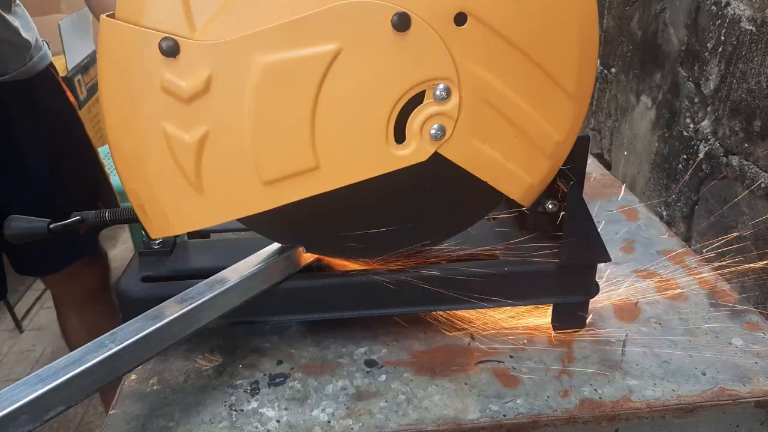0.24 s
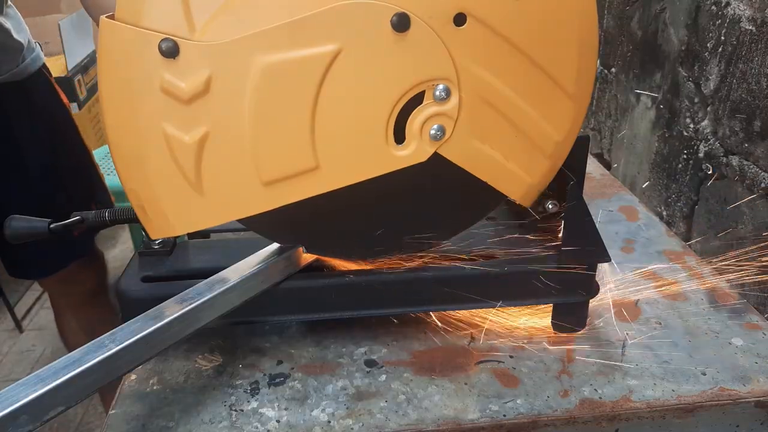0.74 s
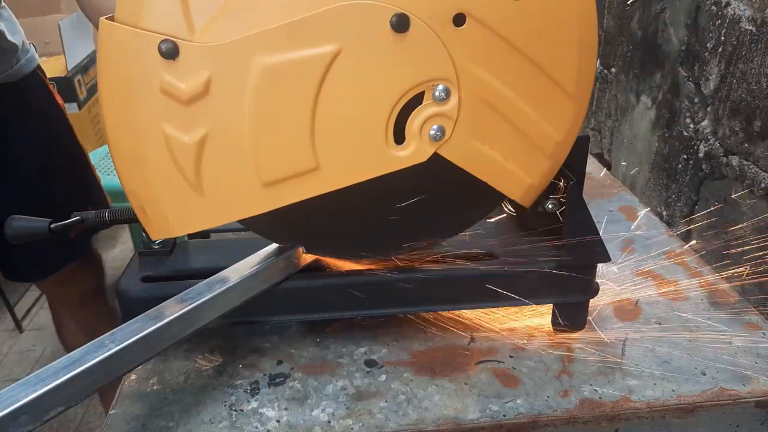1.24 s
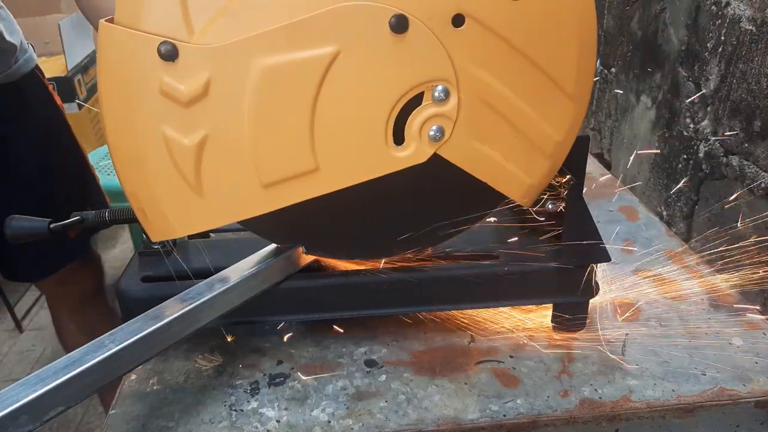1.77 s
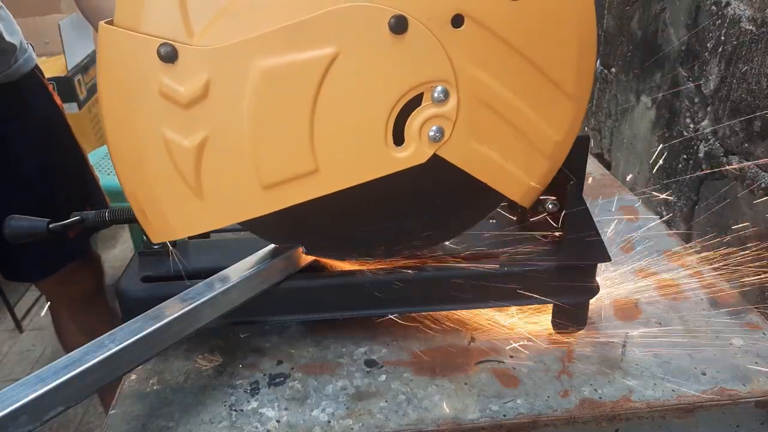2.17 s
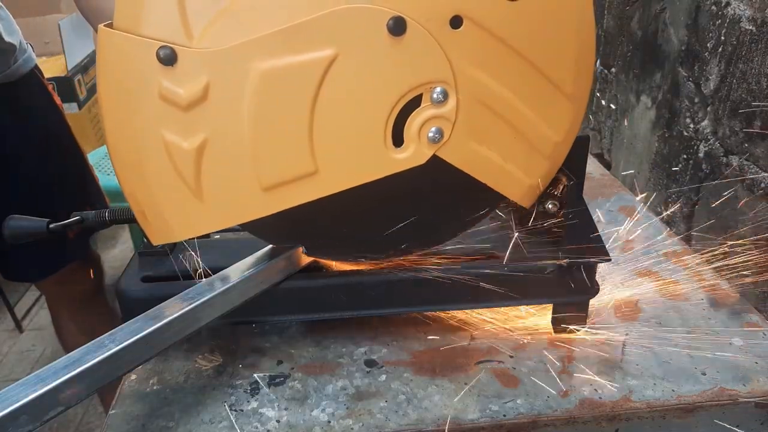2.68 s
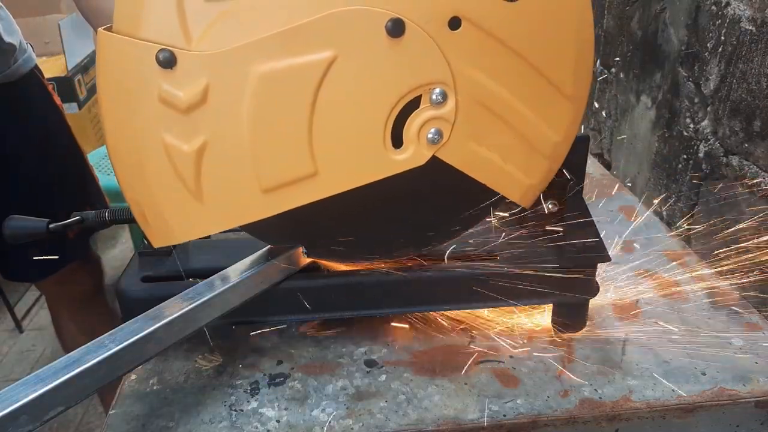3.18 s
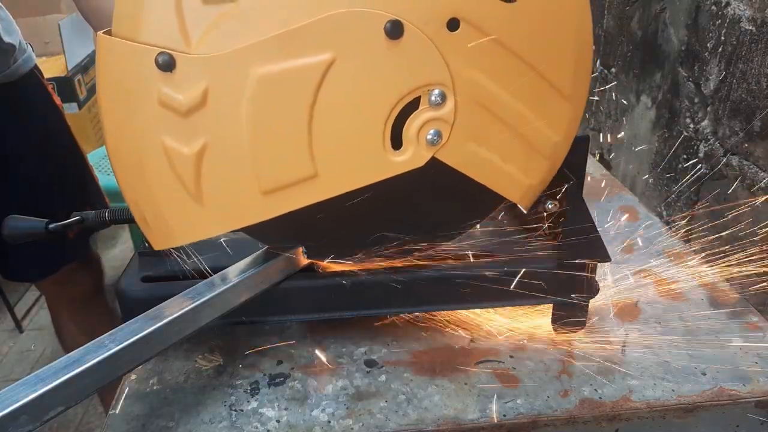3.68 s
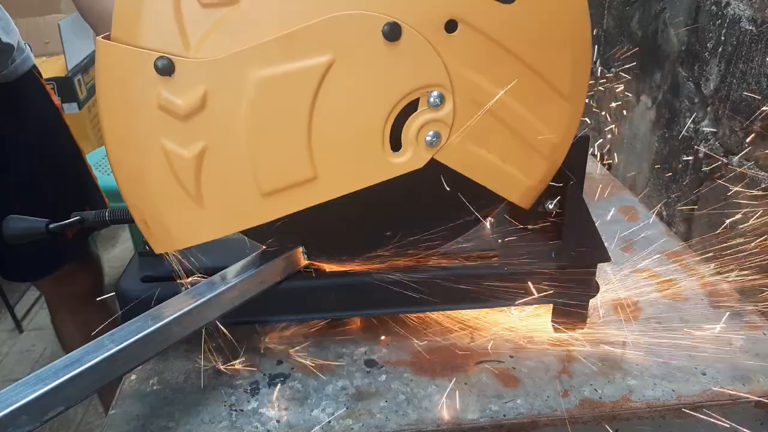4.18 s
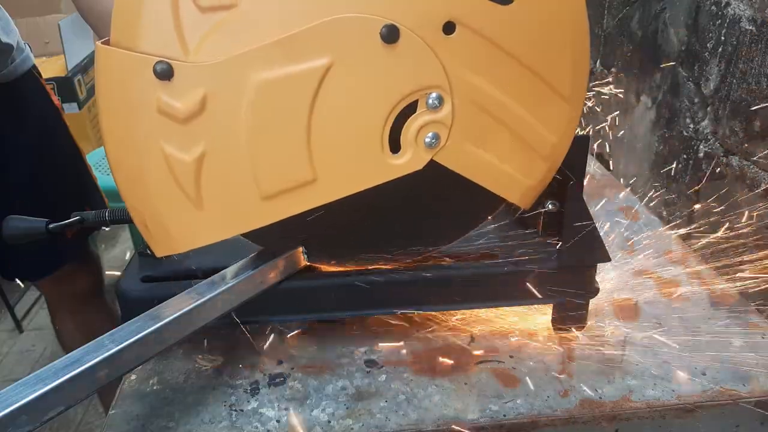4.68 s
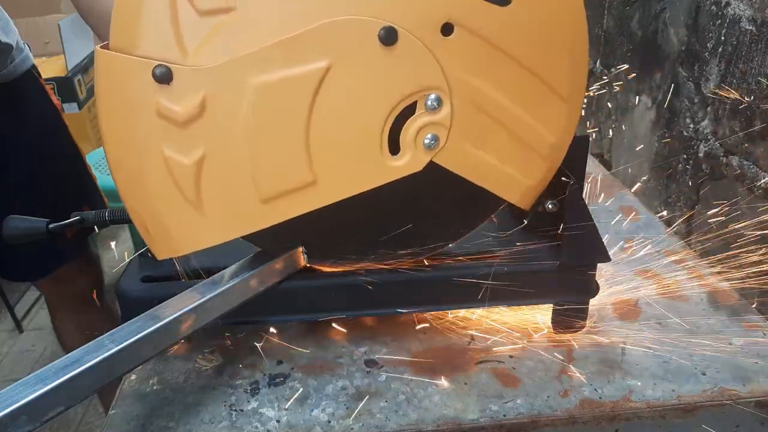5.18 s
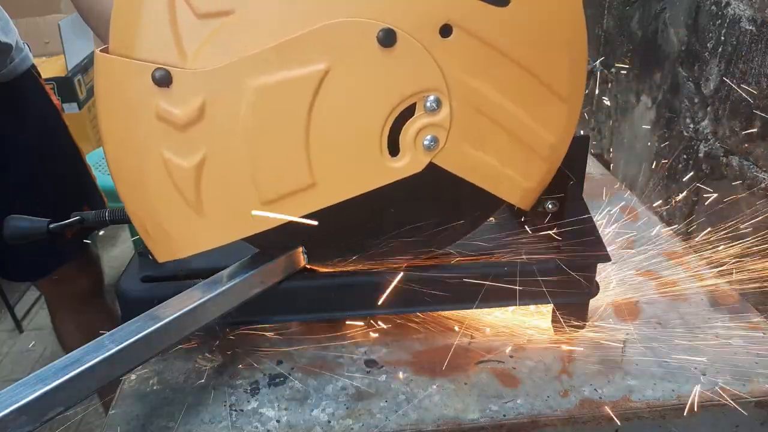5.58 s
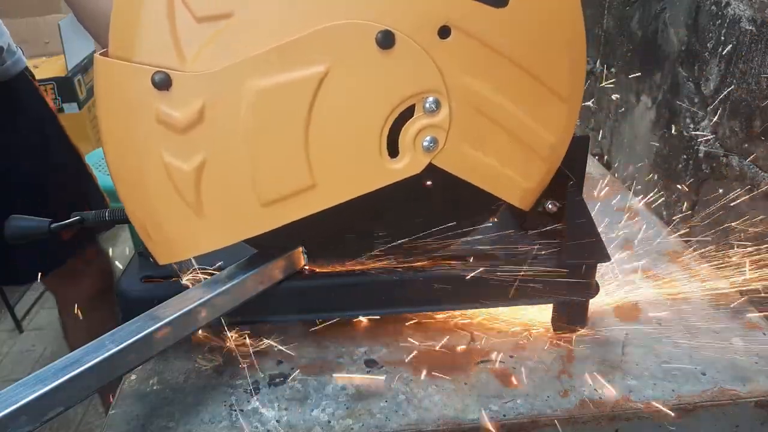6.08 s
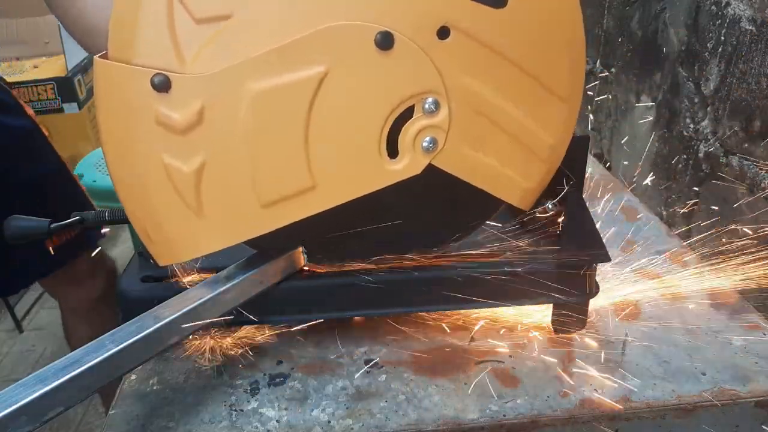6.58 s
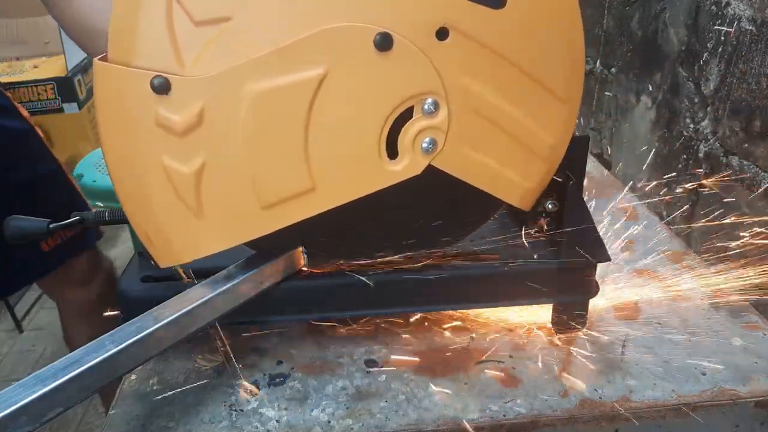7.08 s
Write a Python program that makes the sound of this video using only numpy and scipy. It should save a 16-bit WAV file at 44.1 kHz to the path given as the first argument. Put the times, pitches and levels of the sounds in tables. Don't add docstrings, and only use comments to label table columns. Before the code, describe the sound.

Harsh, continuous high-pitched grinding of a cut-off saw in square steel tube, ringing whistles sliding inside the screech over a low motor hum.

```python
import sys
import numpy as np
from scipy import signal
from scipy.fft import rfft, irfft
from scipy.io import wavfile
from scipy.ndimage import uniform_filter1d, map_coordinates

SR = 44100
rng = np.random.default_rng(int(sys.argv[2]) if len(sys.argv) > 2 else 0)


def ratio_of_db(decibels):
    return 10 ** (np.asarray(decibels, float) / 20)


def dump(signal):
    limited = np.clip(np.atleast_2d(signal).T, -1, 1)
    pcm = np.round(limited * 32767).astype(np.int16)
    wavfile.write(sys.argv[1], SR, pcm)


N = 323694


def evened(x):
    return x / np.sqrt(np.mean(x ** 2) + 1e-20)


def curve(rows, t, axis=1):
    rows = np.array(rows)
    return np.interp(t, rows[:, 0], rows[:, axis])


def patches(shape, tall, wide):
    field = uniform_filter1d(rng.standard_normal(shape), max(round(tall), 1), axis=0)
    return evened(uniform_filter1d(field, max(round(wide), 1), axis=1))


# time in seconds, speed in turns per second.
DISC_SPEED = [(0.0, 52.62), (0.3, 52.04), (0.7, 51.53), (1.3, 50.89), (1.9, 50.02), (2.3, 49.38),
              (2.7, 49.03), (3.3, 48.67), (3.6, 48.62), (4.1, 48.36), (4.35, 48.14), (4.65, 47.74),
              (5.3, 47.74), (5.75, 47.63), (6.1, 47.71), (6.45, 47.97), (6.75, 48.37), (7.34, 48.64)]


def shaft_turns():
    return np.cumsum(curve(DISC_SPEED, np.arange(N) / SR)) / SR


# time in seconds, share of the power that repeats each turn (0-1).
REPEAT = [(0, .55), (.5, .68), (1.8, .58), (2.5, .68), (3.2, .64), (3.38, .88), (3.6, .86), (3.8, .74),
          (4.55, .74), (4.65, .92), (5.3, .92), (5.7, .85), (6.2, .88), (6.6, .75), (7, .8), (7.34, .8)]


def grit(turns, uneven_db=2., lasts=8, wobble=.25):
    points, top_order = 1024, 400
    always_lost, loose_lost = .035, .03
    count = int(turns[-1]) + 3
    turn_s = np.interp(np.arange(count), turns, np.arange(N) / SR)
    like = 1 - always_lost - loose_lost * (1 - curve(REPEAT, turn_s))
    rim = rng.standard_normal((count, points))
    for k in range(1, count):
        rim[k] = like[k] * rim[k - 1] + np.sqrt(1 - like[k] ** 2) * rim[k]
    z = signal.stft(rim.ravel(), nperseg=2 * points)[2]
    z[top_order * 2:] = 0
    z = z * ratio_of_db(uneven_db * patches(z.shape, 2, 4 * lasts))
    rim = signal.istft(z, nperseg=2 * points)[1]
    drift = uniform_filter1d(rng.standard_normal(N), 1500)
    flutter = wobble * evened(uniform_filter1d(drift, 1500))
    return map_coordinates(rim, [turns * points + flutter + points / 2], order=3)


# frequency in Hz, then level in dB in the top wall, entering the sides,
# deep in the sides, pressing on.
COLOURS = [(40.3, -42, -49, -31, -44), (99, 0, -25, -11, -13), (357, -14.5, -18, -14.5, -16.5),
           (433, -3, -4, -4, -5), (1050, -7.5, -12.5, -7, -10), (1390, -5.5, -6, -2.5, -3.5),
           (1800, -8.5, -10, -6.5, -11.5), (2980, -5, -10.5, -3.5, -6.5), (4770, -1.1, -9.5, -2, -4),
           (5750, -6, -8.5, -6.5, -2.5), (8150, 1, -7, -0.6, -1.9), (10980, -7, -12, -9.5, -10.5),
           (13050, -14.5, -19, -16, -18), (16400, -28, -32, -29, -31)]
STAGE_AT = [1.002, 3.1, 5.2, 6.802]
# frequency in Hz, width in Hz, level in dB.
RINGS = [
    [(4480, 41, -5), (5060, 41, 0), (5970, 87, -3), (6050, 51, -3.5), (7640, 68, -3), (8360, 400, -1.5),
     (8970, 110, 2), (10600, 50, 0.5)],
    [(3197, 41, 1.5), (4100, 110, -5), (6170, 63, -7.5), (6520, 18, 4.5), (7560, 66, -4), (7200, 66, -11),
     (8360, 85, -8), (8800, 170, -16)],
    [(4393, 66, 4), (4480, 25, -5), (5770, 70, -2), (7380, 73, -20), (7340, 50, -4), (8350, 29, 5.5),
     (10500, 57, -22)],
    [(2250, 57, -3), (3350, 50, 4), (4230, 37, 4), (4640, 72, 0), (6300, 31, -9), (6625, 53, 2.5),
     (8550, 61, 2)],
]


def body(hz, t, ring_db=1., wide=1.5, lumpy_db=2., patchy_db=1.):
    table, speed = np.array(COLOURS), curve(DISC_SPEED, t)
    fizz_db = 4 * np.clip((hz - 14000) / 1500, 0, 1)
    power = np.zeros((len(hz), len(t)))
    for k, (at, rings) in enumerate(zip(STAGE_AT, RINGS)):
        stage = np.interp(t, STAGE_AT, np.eye(len(RINGS))[k])
        colour_db = np.interp(np.log(hz + 1), np.log(table[:, 0]), table[:, k + 1], left=-40)
        power += stage * ratio_of_db(2 * (colour_db + fizz_db))[:, None]
        for ring_hz, width, db in rings:
            centre_hz = ring_hz * speed / curve(DISC_SPEED, at)
            off = (hz[:, None] - centre_hz) / (wide * width / 2)
            power += stage * ratio_of_db(2 * (db + ring_db)) / np.square(1 + off * off)
    thicket_db = lumpy_db * patches(power.shape, 3, 160) * np.clip(hz / 3000, .3, 1)[:, None]
    return np.sqrt(power) * ratio_of_db(thicket_db + patchy_db * patches(power.shape, 8, 30))


# time in seconds, screech level in dB.
BITE = [(0, -12), (.3, -12), (.8, -11), (2.2, -11.5), (2.8, -11.5), (3.5, -11.5), (3.75, -10.5), (4, -11.5),
        (4.35, -11), (5, -13), (6, -11.5), (6.5, -11), (6.8, -10), (7.34, -10)]
BAND_HZ = [330, 2500, 10500]
LAYERS = [
    (-29, -29.5, -32, -31.5),
    (-13, -11, -10.5, -11.5),
    (0, 0, 0, -1),
    (-10, -13.5, -11, -14),
]


def grind(turns, blur_hz=7500, beat=.09):
    jolt_db, jolt_s = [12, 5, .5, -1], .38
    hz, t, old = signal.stft(grit(turns), SR, nperseg=1024, noverlap=768)
    new = signal.stft(rng.standard_normal(N), SR, nperseg=1024, noverlap=768)[2]
    old_power = uniform_filter1d((abs(old) ** 2).mean(1), size=21)
    old = old / np.sqrt(old_power / (abs(new) ** 2).mean() + 1e-9)[:, None]
    share = np.clip(curve(REPEAT, t), 0, 1) ** np.maximum(hz / blur_hz, 1.1)[:, None]
    share *= np.clip(hz / 2000, .35, 1)[:, None]
    z = np.sqrt(share) * old + np.sqrt(1 - share) * new
    colour, band = body(hz, t), np.searchsorted(BAND_HZ, hz)
    for k, layer_db in enumerate(LAYERS):
        level_db = curve(BITE, t) + np.interp(t, STAGE_AT, layer_db) + jolt_db[k] * np.exp(-t / jolt_s)
        band_power = (colour[band == k] ** 2).sum(0)
        colour[band == k] *= ratio_of_db(level_db) * np.sqrt(len(hz) / band_power)
    out = signal.istft(z * colour, SR, nperseg=1024, noverlap=768)[1]
    return out[:N] * (1 + beat * np.cos(2 * np.pi * turns))


# start in seconds, end in seconds, shaft order, level in dB.
SQUEALS = [(0.31, 0.58, 157, -25.6), (1.12, 1.75, 82, -28), (2.03, 2.6, 84, -19.4), (2.07, 2.48, 132, -27),
           (2.23, 2.64, 149, -24.8), (2.9, 4.5, 65, -26.5), (2.8, 3.3, 83, -25.5), (3.0, 3.8, 85, -21.5),
           (3.3, 3.75, 84, -24.2), (3.17, 3.75, 66, -26.5), (3.8, 4.65, 66, -22.5),
           (4.53, 5.66, 169, -25.5), (4.68, 4.91, 84, -23), (4.74, 5.41, 85, -25.9), (4.91, 5.5, 84, -20.2),
           (5.37, 6.67, 99, -26), (5.41, 6.04, 155, -26), (5.41, 6.08, 85, -19.1), (5.66, 6.29, 68, -24.1),
           (5.71, 6.25, 84, -19.7), (6.08, 6.67, 67, -25.4), (6.08, 6.9, 85, -23.6), (6.3, 6.83, 84, -14.2),
           (6.46, 7.34, 83, -21.4), (6.5, 7, 122, -27), (6.67, 6.92, 139, -24.5), (6.75, 7.34, 143, -24.9),
           (6.82, 7.08, 97, -21), (7.02, 7.4, 85, -16), (0, .35, 82, -27)]
# start in seconds, end in seconds,
# mode frequency in Hz, level in dB.
TUBE_MODES = [(0, 2.6, 4300, -28.5), (0, 1.1, 4040, -26.5), (0, 1.85, 5900, -33), (.27, 2.5, 6100, -32),
              (.46, 1.32, 5240, -29), (.65, 1.4, 4960, -29), (.65, 2.6, 3325, -30), (.58, 1.8, 7680, -32),
              (.3, 1.3, 2694, -31.5), (.77, 1.43, 2915, -30.5), (1.32, 1.75, 2280, -31),
              (.08, 0.65, 8400, -24), (1.71, 2.7, 3824, -29.5), (1.87, 2.76, 8550, -26),
              (2.72, 3.76, 4890, -27), (3.21, 3.75, 6520, -29), (3.54, 3.5, 4540, -29),
              (4.6, 5.3, 3080, -31), (4.12, 4.66, 2470, -30), (4.62, 4.8, 8320, -27),
              (4.7, 6.13, 7920, -27), (5.5, 6, 8980, -27), (5.83, 7.6, 6730, -26), (5.92, 6.7, 5860, -25),
              (6.88, 7.7, 2185, -33), (6.88, 7.34, 8255, -25), (6.92, 7.7, 3200, -26.5),
              (4.081, 5.1, 9130, -27), (4.1, 4.5, 8200, -30), (5.7, 6.5, 2250, -34)]


def squeals(turns, lift_db=1., flutter_db=1.5, fade_s=.15, beat=.3):
    mode_width_hz, step_s = 34, .07
    speed, spin = np.gradient(turns) * SR, np.exp(2j * np.pi * turns)
    out, rows = np.zeros(N), [(*row, None) for row in SQUEALS]
    for a, b, hz, db in TUBE_MODES:
        first, last = hz / curve(DISC_SPEED, np.array([a, b]))
        orders = range(int(min(first, last)), int(max(first, last)) + 2)
        rows += [(a, b, order, db, hz) for order in orders]
    for a, b, order, db, hz in rows:
        i = max(round((a - fade_s / 2) * SR), 0)
        j = min(round((b + fade_s / 2) * SR), N)
        t = np.arange(i, j) / SR
        swell = np.clip(np.minimum(t - a, b - t) / fade_s + .5, 0, 1)
        swell *= 1 + beat * (spin[i:j] * np.exp(1j * order)).real
        if hz:
            swell /= 1 + ((order * speed[i:j] - hz) / mode_width_hz) ** 2
        flutter, slip = rng.standard_normal((2, 60))
        level = ratio_of_db(db + 2.5 + lift_db + flutter_db * flutter)
        level, slip = (np.interp(t - a, np.arange(-2, 58) * step_s, k) for k in (level, slip))
        phase = 2 * np.pi * order * turns[i:j] + .33 * slip + order ** 2
        out[i:j] += swell * level * np.cos(phase)
    return out


# shaft order, then level in dB in the top wall, entering the sides,
# deep in the sides, pressing on.
HUM = [(1, -54, -60, -54, -59), (2, -43.5, -50, -46.5, -44), (3, -53, -55, -43, -53),
       (4, -61, -52, -46.5, -46), (5, -50, -42, -44.5, -40.5), (6, -54, -51, -47.5, -48.5),
       (7, -55, -57, -54, -54), (8, -50, -38, -40, -46), (9, -41, -46, -36, -42), (10, -48, -46, -35, -41),
       (16, -29, -42, -38, -39), (27, -50, -38, -39, -45)]
HUM_AT = [1.85, 2.1, 2.7, 4.1, 5.8, 7]


def hum(turns, lift_db=.5, wander_db=1.2):
    t, out = np.arange(0, N / SR + .05, .05), np.zeros(N)
    for order, wall, entering, deep, press in HUM:
        wander = np.interp(t, np.linspace(0, N / SR, 12), rng.standard_normal(12))
        stage_db = np.interp(t, HUM_AT, [wall, entering, entering, deep, deep, press])
        level = ratio_of_db(stage_db + 3 + lift_db + wander_db * wander)
        tone = np.cos(2 * np.pi * (order * turns + rng.random()))
        out += np.interp(np.arange(N) / SR, t, level) * tone
    return out


# time in seconds, lower edge in Hz, upper edge in Hz.
PUFFS = [(.078, 4177, 5168), (.078, 6848, 8269), (.47, 9604, 12446), (.827, 6848, 8312),
         (.827, 12403, 13781), (.958, 6848, 8269), (1.472, 4177, 5168), (1.472, 5685, 8312),
         (1.472, 13092, 14470), (2.238, 13049, 14470), (2.583, 6245, 7580), (2.633, 4177, 5211),
         (2.633, 12403, 13824), (2.728, 4177, 5211), (3.338, 6288, 9647), (3.59, 10982, 12403),
         (3.872, 4177, 5168), (4.278, 13867, 15848), (4.682, 4608, 6331), (4.682, 13781, 15116),
         (4.824, 5125, 6331), (4.824, 8226, 9690), (5.172, 4608, 6331), (5.312, 11025, 12446),
         (5.88, 12403, 13781), (6.002, 12360, 14470), (6.113, 7537, 9001), (6.484, 6288, 7623),
         (7.068, 4608, 5728), (7.068, 8915, 11025)]


def side_puffs(mid, lift_db=-3.5):
    hop, grid = 1024, 502
    out, n, line = np.zeros(N + 2 * hop), np.arange(2 * hop), np.arange(hop) + .5
    window = signal.windows.kaiser_bessel_derived(2 * hop, 4 * np.pi)
    line_hz = line * SR / (2 * hop)
    for s, lo, hi in PUFFS:
        used = line[(line_hz > lo) & (line_hz < hi)]
        cosines = np.cos(np.pi / hop * np.outer(n + 512.5, used))
        i = round((s * SR - grid) / hop) * hop + grid - hop
        band = np.linalg.norm((mid[i:i + 2 * hop] * window) @ cosines) * 2 / hop
        noise = evened(cosines @ rng.standard_normal(len(used)))
        out[i:i + 2 * hop] += ratio_of_db(lift_db) * band * noise * window / np.sqrt(2)
    return out[:N]


# time in seconds, length in slots of about 32 ms.
THINNED = [(.874, 1), (1.176, 1), (1.431, 1), (1.64, 1), (1.686, 1), (1.733, 1), (1.849, 1), (2.011, 1),
           (2.058, 1), (2.128, 1), (3.196, 1), (3.985, 1), (4.496, 1), (4.542, 1), (5.796, 1), (6.76, 2),
           (7.189, 1), (7.325, 1)]


def thinned(x, apart_hz=650, top_hz=10500, top_db=-13., keep_db=-1.8, blur=.02):
    out = x.copy()
    for s, slots in THINNED:
        length_s, lost = .004 + .032 * slots, 1 - .045 ** slots
        i = round((s - length_s / 2) * SR)
        part = x[i:i + round(length_s * SR)]
        fade = np.clip(lost, 0, 1) * signal.windows.tukey(len(part), .8)
        z, hz = rfft(part), np.fft.rfftfreq(len(part), 1 / SR)
        kept = np.zeros_like(z)
        edges = 150 + apart_hz * (np.arange(26) + .8 * rng.random(26))
        for lo, hi in zip(edges, edges[1:]):
            inside = (hz >= lo) & (hz < hi)
            peak_hz = hz[inside][abs(z[inside]).argmax()]
            quiet = (lo > top_hz) | (900 < peak_hz < 2400)
            weak_db = -top_db * quiet * 2 * rng.random()
            line = z * (abs(hz - peak_hz) < 20 + blur * peak_hz)
            match = np.linalg.norm(z[inside]) / (np.linalg.norm(line) + 1e-9)
            kept += line * match * ratio_of_db(keep_db - weak_db)
        out[i:i + len(part)] = (1 - fade ** 2) ** .64 * part + fade * irfft(kept, len(part))
    return out


# time in seconds, level in dB.
KNOCKS = [
    (6.668, -15.),
    (6.736, -10),
    (6.978, -15),
]


def knocks():
    ring_hz, t60_s, attack_s = 482, .049, .0022
    out, t = np.zeros(N), np.arange(3000) / SR
    for s, db in KNOCKS:
        i = round(s * SR)
        envelope = np.minimum(t / attack_s, 1) * ratio_of_db(db - 60 * t / t60_s)
        out[i:i + len(t)] += envelope * np.sin(2 * np.pi * ring_hz * t)
    return out


def scene():
    turns = shaft_turns()
    saw = ratio_of_db(-.5) * grind(turns) + squeals(turns) + hum(turns) + knocks()
    return np.array([saw, saw])


def roll_off(x):
    return signal.sosfilt(signal.butter(12, 16220, fs=SR, output="sos"), x)


def record(dry):
    mid = thinned(np.clip(dry[0], -.93, .93))
    side = side_puffs(mid)
    return roll_off(np.array([mid + side, mid - side]))


dry = scene()
out = record(dry)
dump(out)
```